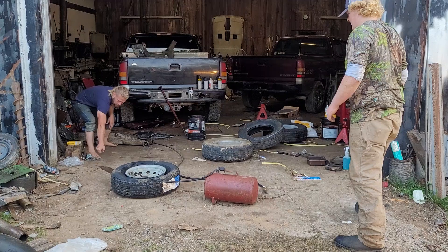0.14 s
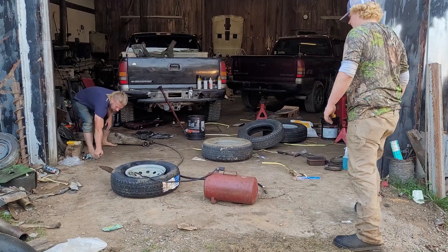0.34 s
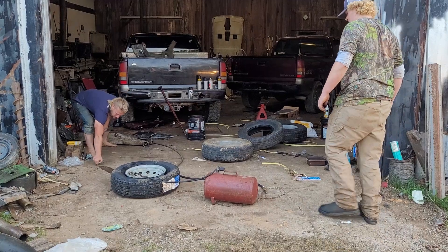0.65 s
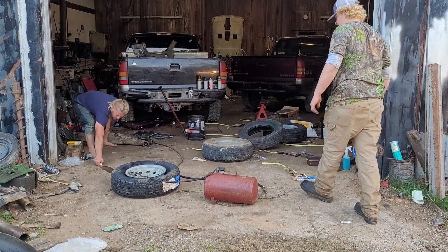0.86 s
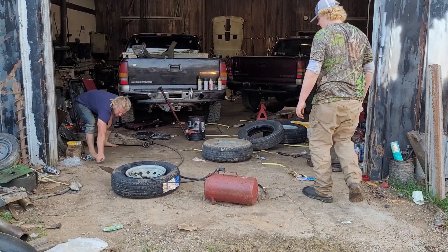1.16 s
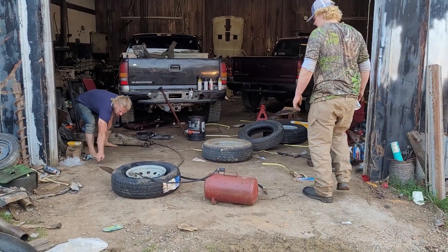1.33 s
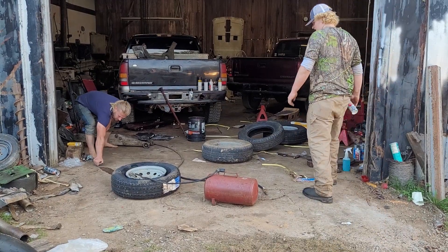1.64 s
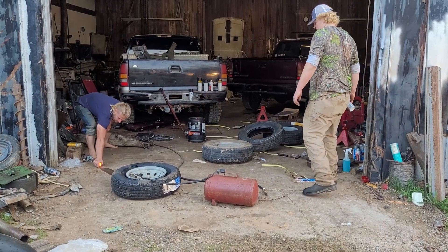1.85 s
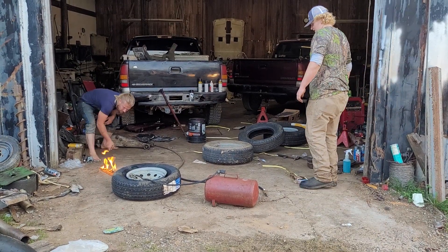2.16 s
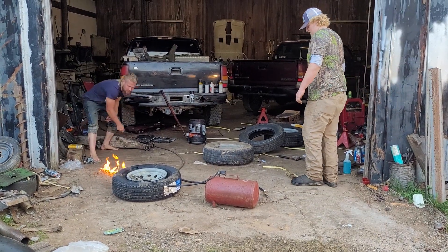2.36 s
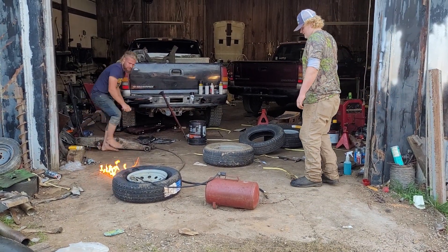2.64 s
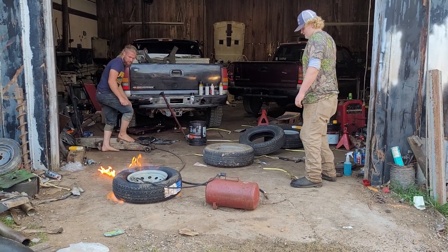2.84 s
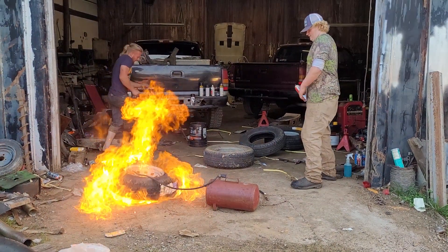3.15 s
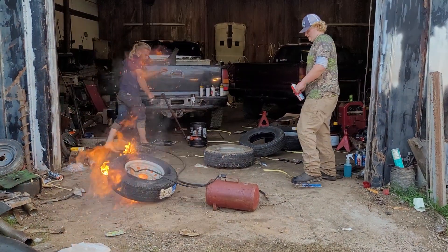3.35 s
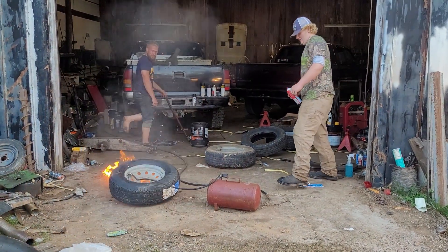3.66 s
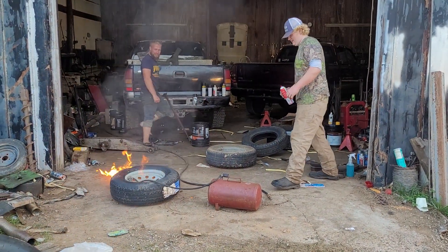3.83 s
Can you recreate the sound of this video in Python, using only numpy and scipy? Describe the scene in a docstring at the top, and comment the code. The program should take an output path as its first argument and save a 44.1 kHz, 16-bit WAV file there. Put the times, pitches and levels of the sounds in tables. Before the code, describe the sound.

Loud hollow bang of fuel igniting inside a tyre, preceded by leaking air, a low motor and crickets, followed by brief flame roar, garage reverberation and wheel knocks; stereo microphone some metres away, level ducking afterwards.

```python
"""Outside a garage, air hisses from an unseated tyre over a motor's hum and crickets.
Fuel vapour in the tyre ignites: a burst of pops thumps its cavity and cracks, over a roar of flame.
The bead seals and the hiss stops, the garage rings in random echoes and the wheel bounces on dirt.
Hiss, rumble and flame are shaped noise, hum and chirps are sines, and hits ring decaying modes.
A gain control pulls the level down after the bang and gives little of it back."""
import sys
import numpy as np
from scipy import signal
from scipy.io import wavfile
from scipy.ndimage import uniform_filter1d

SR = 44100
rng = np.random.default_rng(int(sys.argv[2]) if len(sys.argv) > 2 else 0)


def digitize_waveform(pressure):
    """Quantize a signal to 16-bit integers and store it at the path in sys.argv[1].

    Rows of a 2-D input are taken as channels; values are limited to [-1, 1].
    """
    field = np.atleast_2d(pressure).T
    bounded = np.clip(field, -1, 1)
    quanta = np.round(bounded * 32767).astype(np.int16)
    wavfile.write(sys.argv[1], SR, quanta)


def voltage_ratio(level):
    """Linear amplitude factor for a level in decibels (scalar or array-like)."""
    return 10 ** (np.asarray(level, float) / 20)


N = 176400  # samples, 4 s

# In every noise colour and mode table, level_db is relative: the sound is scaled after shaping.
# Sameness of left and right in the low-pitched noises: pitch_hz, likeness (0 to 1)
STEREO_LIKENESS = [(60, 0.96), (350, 1), (520, 0.08), (900, 1), (1500, 0.11)]
# Echo decay of the garage: pitch_hz, t60_s
GARAGE_DECAY = [(60, 0.75), (1000, 0.96), (3000, 0.94), (6000, 0.92), (12000, 0.37)]
# Near cricket's chirps: start_s
CHIRP_STARTS = [0.346, .639, .933, 1.247, 1.534, 1.834, 2.165, 2.498, 2.798]
# Colour of the farther crickets' trill: pitch_hz, level_db (per Hz)
TRILL_COLOUR = [(4150, -38), (4370, 3.5), (4520, 3), (4750, -42)]
# Motor hum partials: multiple of shaft speed, level_db (rms)
HUM_ORDERS = [(1, -58.5), (3, -52.5), (6, -50.5), (7, -55.5), (8, -52.5), (9, -50.5)]
# Colour of the motor rumble: pitch_hz, level_db (per Hz)
RUMBLE_COLOUR = [(20, -33.5), (36, -6.5), (107, -2), (178, -12.5), (300, -1), (500, -16), (960, -14.5),
                 (1150, -24.5), (1500, -56)]
# Colour of the escaping air: pitch_hz, level_db (per Hz)
HISS_COLOUR = [(600, -32), (1250, -8), (1500, -13.5), (1950, -7.5), (2250, -5.5), (2750, -9.5),
               (3700, -3.5), (4500, -6.5), (6850, -7), (8900, -18.5), (13200, -12), (15700, -10),
               (16050, -55.5)]
# Placement of the escaping air: pitch_hz, left_minus_right_db
HISS_PAN = [(700, -1.5), (4400, 1), (8000, 5.5)]
# Colour of the burning fuel, also lent to the dirt scuff: pitch_hz, level_db (per Hz)
FLAME_COLOUR = [(29, -41.5), (50, -2), (630, -16.5), (1100, -19.5), (1360, -19.5), (2810, -23),
                (16000, -49)]
# Swell and decline of the flame: time_s, level_db
FLAME_LEVEL = [(2.748, -61), (2.956, -39.5), (2.989, -19.5), (3.56, -42.5), (3.9, -44.5), (4, -47)]
# Wheel landings: start_s, ring_db, thud_db
LANDINGS = [(3.373, -17.5, -24), (3.717, -13.5, -17), (3.989, -8, -25)]
# Ringing modes of rim and tyre: pitch_hz, level_db, t60_s
WHEEL_MODES = [(270.6, 7.5, 0.15), (321.4, 1, 0.35), (896, -6.5, 0.11), (990, -7.5, 0.26),
               (1775, -8.5, 0.063), (2350, -21, 0.036)]
# Modes of the tyre thudding on the ground: pitch_hz, level_db, t60_s
THUD_MODES = [(58.8, -5, 0.29), (115.8, -5, 0.25)]
# Ignition pops: start_s, thump_db, crack_db, crack_t60_s
POPS = [(2.985, -13, -18, 0.096), (2.991, 0, -14, 0.059), (2.9965, -4.5, -20, 0.043),
        (3.000, -1, -8.5, 0.017), (3.009, 3, -21, 0.016), (3.0215, -3, -8.5, 0.022),
        (3.029, -10, -1.5, 0.054), (3.043, -10, -7, 0.11), (3.056, -12.5, -8.5, 0.097)]
# Colour of the cracks: pitch_hz, level_db (per Hz)
CRACK_COLOUR = [(250, -4), (560, -16), (850, -5.5), (1300, -19), (3000, -12), (4200, -16.5), (6500, -23),
                (8500, -36.5), (15000, -33.5)]
# Modes of the tyre's air cavity: pitch_hz, level_db, t60_s
CAVITY_MODES = [(81, -4, 0.08), (148, 1, 0.07), (232.6, -7.5, 0.31), (362, -7.5, 0.087)]

SEAL_S = 3.0  # the bead seals; the far trill stops too
RIGHT_LOUDER = voltage_ratio(np.array([[-1], [1]]))  # left and right gains for pops and landings


def read(points, hz):
    """Table value on a log-frequency axis."""
    f, value = np.transpose(points)
    return np.interp(np.log(hz + 1), np.log(f + 1), value)


def evened(x):
    """Scales to rms 1."""
    return x / np.sqrt(np.mean(x ** 2) + 1e-20)


def noise(colour, same, lead_s=0., patchy_db=3.0, pan=((1, 0),), ripple_db=0., size=1024):
    """Stereo noise from random short-time spectra with soft patches; reflections ripple each side's colour."""
    hz = np.fft.rfftfreq(size, 1 / SR)[:, None]
    a, b, c, d, patches = rng.standard_normal((4 * N // size + 5, len(hz), 5)).T
    # smear the patches over 8 bins and 10 frames
    patches = evened(uniform_filter1d(uniform_filter1d(patches, 8, 0), 10, 1))
    same = np.clip(same, 0, 1)
    left = a + 1j * b
    late_left = left * np.exp(-2j * np.pi * hz * lead_s)  # the left side leads by lead_s
    right = same * late_left + np.sqrt(1 - same ** 2) * (c + 1j * d)
    side = voltage_ratio(read(pan, hz) / 2)
    ripple = ripple_db * rng.standard_normal((2, len(hz), 1))
    gain = voltage_ratio(read(colour, hz) + patchy_db * patches + ripple)
    spectra = np.array([left * side, right / side]) * gain
    return evened(signal.istft(spectra, nperseg=size, noverlap=3 * size // 4)[1][:, :N])


def wander(hz):
    """Slow drift of rms 1: sines of random phase, from hz / 20 up to hz."""
    t = np.arange(N) / SR
    return evened(sum(np.sin(2 * np.pi * (f * t + rng.random())) for f in np.geomspace(hz / 20, hz, num=16)))


def ring(modes, sag=0.):
    """Response of a struck body, peak 1; squeezed rubber starts it sharp by 0.68 sag, easing off."""
    t = np.arange(SR // 2) / SR
    bent = t + sag * 0.019 * (1 - np.exp(-t / 0.028))
    x = sum(voltage_ratio(db - 60 * t / t60) * np.sin(2 * np.pi * hz * bent) for hz, db, t60 in modes)
    return x / abs(x).max()


def likeness(size):
    """Left-right likeness per frequency bin."""
    return read(STEREO_LIKENESS, np.fft.rfftfreq(size, 1 / SR)[:, None])


def garage(x):
    """Sparse random echoes, each band dying at its own speed, with left-right likeness set by pitch."""
    taps = np.zeros((2, SR))
    # one tap in every 20 samples, from 36 ms on
    at = np.arange(1600, SR - 20, 20) + rng.integers(0, 20, (2, (SR - 1601) // 20))
    np.put_along_axis(taps, at, rng.choice([-1., 1.], at.shape), 1)
    hz, t, z = signal.stft(taps, SR, nperseg=512)
    same = np.clip(likeness(512), 0, 1)
    z = np.array([z[0], same * z[0] + np.sqrt(1 - same ** 2) * z[1]])
    decay = voltage_ratio(-60 * t / read(GARAGE_DECAY, hz)[:, None])
    tail = signal.istft(z * decay, SR, nperseg=512)[1]
    return signal.fftconvolve(x.mean(0)[None], tail / np.linalg.norm(tail[0]), axes=1)[:, :N]


def near_cricket():
    """Chirps of three pulses, each a sine gliding down under a rounded swell."""
    pulse_s, gap_s = 0.0232, .0395  # gap from one pulse start to the next
    top_hz, fall_hz, chirp_db = 4980, 600, -28.5  # each pulse strays from this fall and level
    near = np.zeros(N)
    u = np.arange(0, 1, 1 / (pulse_s * SR))  # progress through a pulse
    swell = np.sin(np.pi * u ** 1.1)
    for start_s, chance in zip(CHIRP_STARTS, rng.standard_normal((len(CHIRP_STARTS), 3, 2))):
        for k in range(3):
            hz = top_hz - fall_hz * (1 + 0.16 * chance[k, 1]) * u ** 1.98
            pulse = swell * np.sin(2 * np.pi * np.cumsum(hz) / SR)
            near[round((start_s + k * gap_s) * SR):][:len(u)] = voltage_ratio(chirp_db + chance[k, 0]) * pulse
    return np.array([voltage_ratio(-4) * np.roll(near, 3), near])  # left is softer and 3 samples late


def far_crickets():
    """Narrow-band noise as a shimmer of trills on the left, slowly fading and silent from the seal on."""
    t = np.arange(N) / SR
    fade = voltage_ratio(-45 - 1.3 * t)  # start level in dB, fade in dB per s
    shimmer = noise(TRILL_COLOUR, 0.16, patchy_db=1.0, pan=[(1, 12.0)])
    return fade * shimmer * (np.arange(N) < SEAL_S * SR)


def motor():
    """Shaft orders wavering in pitch and level, over a rumble of low noise."""
    shaft_hz, rumble_db = 37.42, -42  # mean shaft speed
    turn = 2 * np.pi * np.cumsum(shaft_hz * (1 + 0.00844 * wander(5))) / SR
    hum = sum(voltage_ratio(db + 2.4 * wander(12)) * np.cos(round(k) * turn) for k, db in HUM_ORDERS) * np.sqrt(2)
    rumble = noise(RUMBLE_COLOUR, likeness(2048), patchy_db=1.0, ripple_db=2.0, size=2048)
    return hum + voltage_ratio(rumble_db) * rumble


def leak():
    """Escaping air as shaped noise, cut off when the bead seals."""
    hiss_db, seal_t60_s = -38, .02
    t = np.arange(N) / SR
    air = noise(HISS_COLOUR, 0.22, lead_s=0.000573, patchy_db=2.13, pan=HISS_PAN, ripple_db=4.0, size=2048)
    return air * voltage_ratio(hiss_db - 60 * np.clip(t - SEAL_S, 0, 1) / seal_t60_s)


def flame():
    """Fluttering roar of burning fuel: shaped noise that swells and declines."""
    time_s, db = np.transpose(FLAME_LEVEL)
    t = np.arange(N) / SR
    level = voltage_ratio(np.interp(t, time_s, db) + 1.5 * wander(40))
    return (t > time_s[0]) * level * noise(FLAME_COLOUR, likeness(512), patchy_db=2.0, size=512)


def bounces():
    """The wheel drops back on the ground: a sagging thud, the ring of rim and tyre, a scuff of dirt."""
    knock, thud = np.zeros((2, N))
    for start_s, ring_db, thud_db in LANDINGS:
        knock[round(start_s * SR)] = voltage_ratio(ring_db)
        thud[round(start_s * SR)] = voltage_ratio(thud_db)
    soft_start = np.minimum(np.arange(SR // 2) / (0.0019 * SR), 1)
    rim = ring(WHEEL_MODES, sag=0.041) * soft_start
    body = signal.oaconvolve(knock, rim) + signal.oaconvolve(thud, ring(THUD_MODES, sag=0.748))
    t = np.arange(SR // 5) / SR
    scuff_level = signal.oaconvolve(knock, voltage_ratio(-21 - 60 * t / 0.27))[:N]
    scuff = scuff_level * noise(FLAME_COLOUR, likeness(512), size=512)
    return body[:N] * RIGHT_LOUDER + scuff


def bang():
    """Each pop thumps the tyre's cavity and throws a crack of noise."""
    t = np.arange(N) / SR
    kicks, crack_level = np.zeros((2, N))
    for k, (start_s, thump_db, crack_db, t60_s) in enumerate(POPS):
        kicks[round(start_s * SR)] = voltage_ratio(thump_db) * (-1) ** k  # pushes alternate in sign
        attack = np.clip((t - start_s) / 0.00019, 0, 1)
        crack_level += attack * voltage_ratio(crack_db - 60 * np.clip(t - start_s, 0, 1) / t60_s)
    thump = signal.oaconvolve(kicks, ring(CAVITY_MODES))[:N]
    crack = crack_level * noise(CRACK_COLOUR, likeness(256), patchy_db=3.0, size=256)
    return thump * RIGHT_LOUDER + crack


def scene():
    """Sums all sources; pops and landings excite the garage, and its side reaches the left port first."""
    low_cut = signal.butter(2, 55, "high", fs=SR, output="sos")
    blast = signal.sosfilt(low_cut, bang())
    drops = bounces()
    echoes = voltage_ratio(-7) * garage(blast + voltage_ratio(-4.5) * drops)
    left, right = blast + drops + echoes + motor() + flame()
    garage_side = np.array([left, np.roll(right, 6)])  # right comes 6 samples later
    return garage_side + leak() + near_cricket() + far_crickets()


def low_pass(x):
    """Removes everything above the highest recorded frequency."""
    return signal.sosfilt(signal.butter(12, 16300, fs=SR, output="sos"), x)


def record(dry):
    """Gain control that eases down after the loudest moment and barely recovers, then slight saturation."""
    limit_db, squeeze = -29.5, 1  # squeeze: dB of cut per dB over the limit
    fall_s, recover_db_per_s = 0.23, 1.  # fall_s is the smoothing time of the cut
    power_db = 10 * np.log10(abs(uniform_filter1d((dry ** 2).mean(0), 2000)) + 1e-12)
    recovery = np.arange(N) * recover_db_per_s / SR
    held_db = np.maximum.accumulate(power_db + recovery) - recovery
    over_db = np.maximum(held_db - limit_db, 0)
    r = np.exp(-1 / (fall_s * SR))
    cut_db = squeeze * signal.lfilter([1 - r], [1, -r], over_db)
    mix = 1.3 * np.tanh(dry * voltage_ratio(-cut_db) / 1.3)
    fade_in = np.clip((np.arange(N) / SR - .111) / 0.00067, 0, 1)  # silent until 0.111 s
    return low_pass(mix * fade_in)


dry = scene()
out = record(dry)
digitize_waveform(out)
```